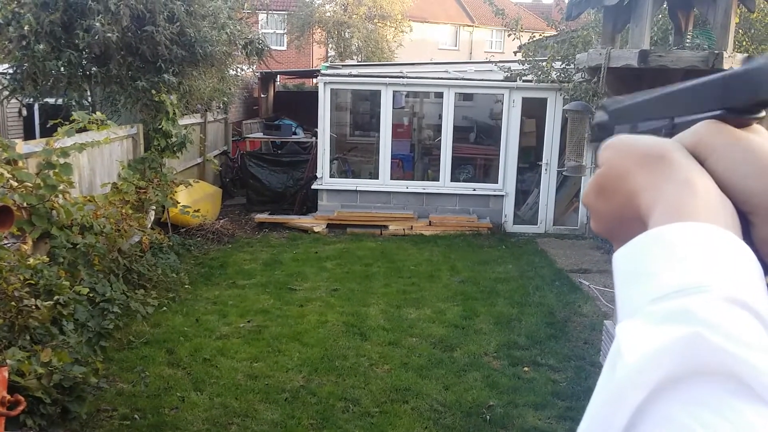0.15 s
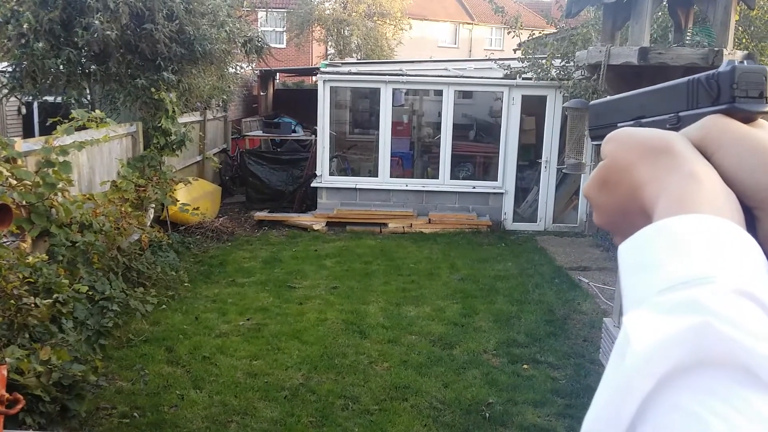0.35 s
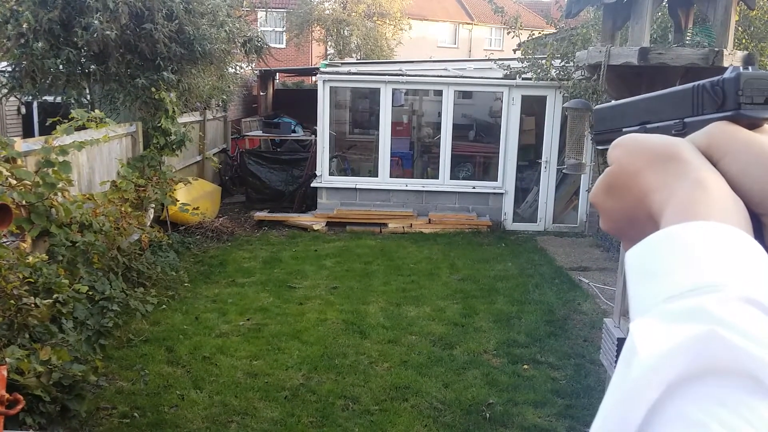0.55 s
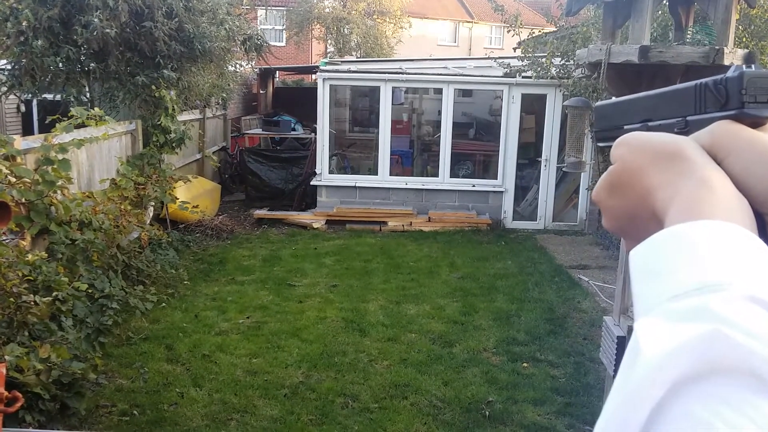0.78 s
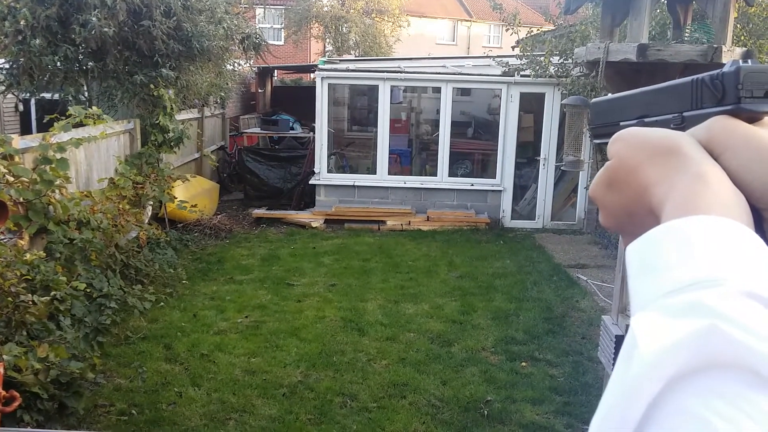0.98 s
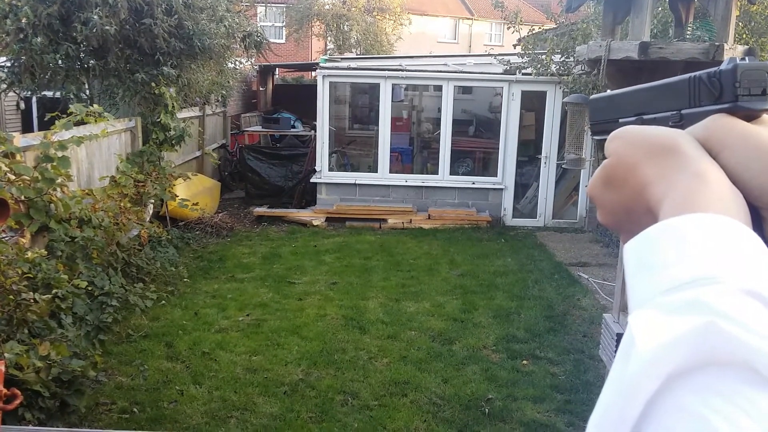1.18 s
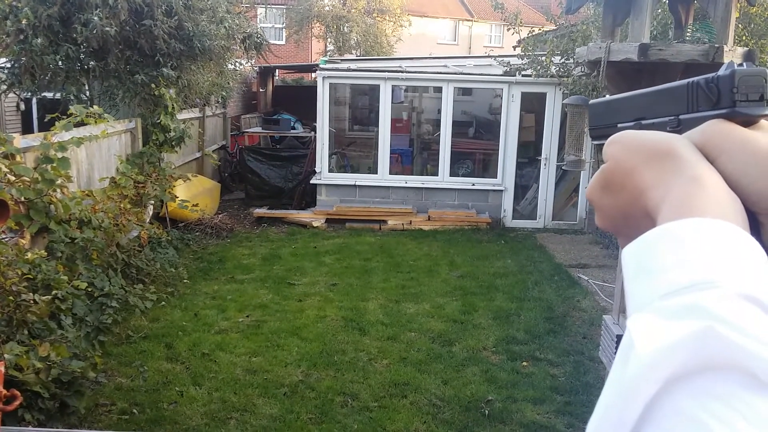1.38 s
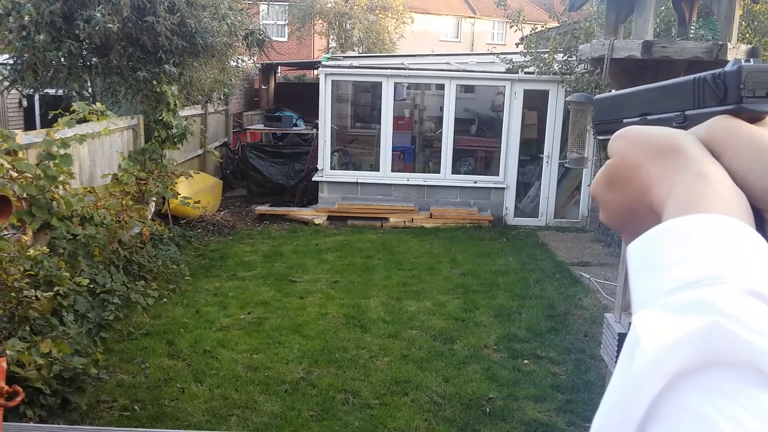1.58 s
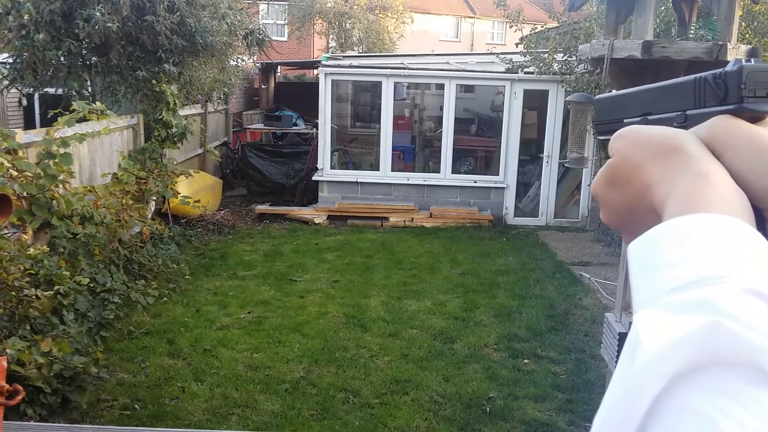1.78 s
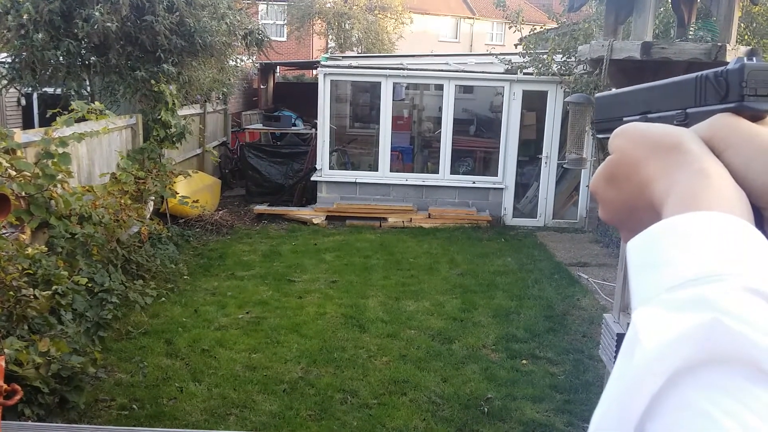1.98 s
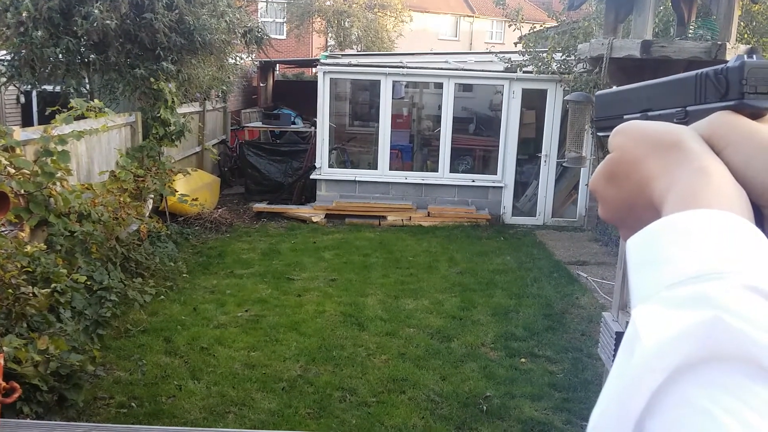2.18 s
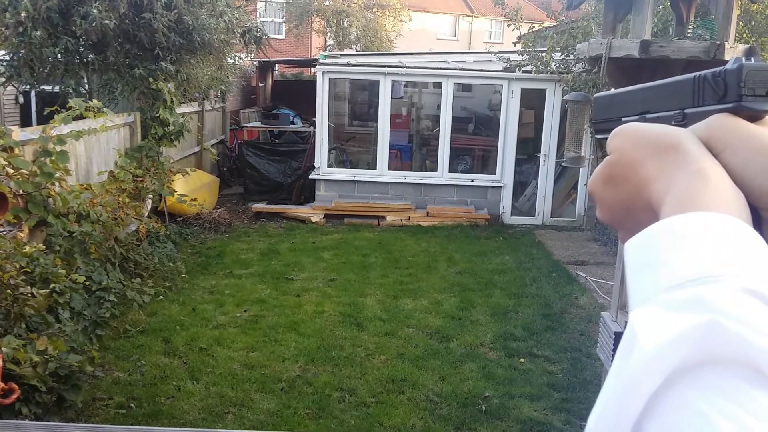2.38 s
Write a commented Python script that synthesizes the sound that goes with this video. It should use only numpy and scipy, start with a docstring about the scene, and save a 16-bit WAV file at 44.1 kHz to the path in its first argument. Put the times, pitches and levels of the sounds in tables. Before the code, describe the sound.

A gas airsoft pistol fires three evenly paced shots right beside the microphone. Each is a sharp pop with a metallic slide clack, followed by the pellet cracking on a target across the garden, with a short echo.

```python
"""Airsoft pistol in a fenced garden

A gas blowback pistol fires three shots right beside the microphone. Each time the trigger ticks, gas
rushes, the hammer knocks, the muzzle pops, and the slide flies back and slams home. A fifth of a
second later the pellet cracks on a target across the lawn. Fences and walls answer over a quiet rumble."""
import sys
import numpy as np
from scipy import signal
from scipy.fft import rfft, irfft, next_fast_len
from scipy.io import wavfile

SR = 44100
rng = np.random.default_rng(int(sys.argv[2]) if len(sys.argv) > 2 else 0)


def pcm_store(signal):
    """Save signal as 16-bit PCM."""
    levels = np.round(np.clip(np.atleast_2d(signal), -1, 1) * 32767)
    wavfile.write(sys.argv[1], SR, levels.astype(np.int16).T)


N = 108045
SIZE = 32768  # samples in one event or echo tail
T, HZ = np.arange(SIZE) / SR, np.fft.rfftfreq(SIZE, 1 / SR)

# shots at the microphone: hammer t/s, hammer level/dB, gas level/dB, muzzle pop t/s, pop level/dB
SHOTS = [(0.2087, 10, 8.5, .2198, 21), (1.1269, 9, 10.5, 1.1388, 20), (1.9556, 10, 9.5, 1.9693, 18.5)]
# spectrum of the hammer on the valve: f/Hz, level/dB
HAMMER_COLOUR = [(30, -31), (80, -10.5), (170, 0.5), (440, 8), (1100, -8.5), (1500, 1.5), (2000, -9.5),
                 (3300, -4), (4900, -2), (5800, -21), (9000, -23), (15000, -27.5)]
# spectrum of the gas rush: f/Hz, level/dB
GAS_COLOUR = [(40, -27.5), (160, 4), (500, 4), (1500, 0), (2100, 0), (4800, -1), (6000, -12.5),
              (15000, -28.5)]
# spectrum of the muzzle pop: f/Hz, level/dB
POP_COLOUR = [(30, -38), (70, -20.5), (140, -4), (380, -0.5), (750, -2), (1200, -10), (1800, -30.5),
              (8000, -52.5)]
# slide contacts, five a shot (rear stop, pellet pick-up, feed, closing, rebound):
# t/s, level/dB, rattle t60/s, ring offset/dB, favoured ring f/Hz, left minus right/dB
SLIDE_CONTACTS = [(0.2311, 2, .035, 0, 4900, 0.5), (0.2495, -0.5, 0.043, -7.5, 3400, -4),
                  (.2530, -1, 0.011, 2.5, 4900, 5), (0.2597, 6.5, 0.048, -6.5, 3460, 1.5),
                  (0.2955, -7.5, 0.014, -15, 4470, -2), (1.1497, 5.5, 0.039, -3.5, 3400, -1.5),
                  (1.1727, 1.5, .08, -4, 4900, 6.5), (1.182, 5.5, 0.027, -2, 3400, 1.5),
                  (1.1858, 2.5, .05, 0, 2685, 1), (1.2070, -7, 0.02, -7.5, 4900, 7.5),
                  (1.9819, 1, 0.039, 7.5, 3670, -2.5), (2.0077, -2.5, .05, -4, 4900, 15),
                  (2.0107, -2.5, 0.011, 1.5, 4900, 3.5), (2.018, 7, 0.055, -11.5, 3400, -1),
                  (2.0419, -7, 0.017, -5.5, 4500, 6.5)]
# spectrum of a slide contact: f/Hz, level/dB
CLACK_COLOUR = [(40, -25.5), (200, -17.5), (450, -6), (1000, -2), (1550, 7.5), (1950, 0), (3200, 2.5),
                (5000, 0), (5800, -7), (9000, -15.5), (11000, -21), (16000, -25.5)]
# modes of slide and frame: f/Hz, level/dB, t60/s
METAL_MODES = [(1570, 1, .03), (2630, -10, 0.06), (3428, 0, 0.022), (4340, -12.5, 0.026),
               (4900, -1.5, 0.024), (7270, -13.5, 0.022), (8860, -9.5, .02)]
# trigger take-up and reset: t/s, level/dB, rattle t60/s
TRIGGER_TICKS = [(.1728, -30.5, 0.019), (.9887, -27, 0.16), (1.0930, -30, .02), (1.9282, -33.5, .025),
                 (2.4078, -25.5, 0.29)]
# spectrum of a trigger tick: f/Hz, level/dB
TRIGGER_COLOUR = [(100, -24), (800, -0.5), (1300, 6), (2000, -1.5), (4700, -4), (6000, -18), (15000, -27)]
# pellet hits, each followed by a weaker knock: t/s, level/dB, treble tilt/(dB per octave), knock f/Hz
PELLET_HITS = [(.4133, 14, -1, 1510), (0.4273, 3.5, -1.5, 812), (1.3372, 13, -3.5, 1650),
               (1.3500, 3, -3, 1150), (2.1739, 13, -5.5, 1000), (2.1915, 3, -4.5, 950)]
# spectrum of the crack from across the lawn: f/Hz, level/dB
TARGET_COLOUR = [(30, -34.5), (80, -18), (170, -1.5), (350, -12.5), (600, -10.5), (1000, -0.5),
                 (1700, -1.5), (2000, -2.5), (2900, -3), (4900, -13), (6000, -28), (10000, -45.5),
                 (16000, -52)]
# where the crack sits in the stereo image: f/Hz, left minus right/dB
TARGET_BALANCE = [(400, -2.5), (2300, -0.5), (4400, 12), (8000, 13), (15000, 5)]
# modes of the target: f/Hz, level/dB, t60/s
TARGET_MODES = [(806, -7.5, 0.034), (985, -1, .03), (1150, -4.5, 0.029), (1465, -1.5, .022),
                (1700, 0.5, 0.03), (2790, -5, 0.036)]
# decay of the echoes from the near fences: f/Hz, t60/s
GARDEN_T60 = [(60, 0.7), (160, 0.23), (400, 0.33), (1400, 0.25), (3000, 0.29), (5000, 0.34), (7500, 0.28),
              (15000, 0.18)]
# scattered sound at the microphone: f/Hz, left-right correlation
STEREO_LIKENESS = [(30, 0.41), (80, 0.13), (160, 0.72), (400, .8), (750, 0.31), (1500, .1), (4000, 0)]
# spectrum of the outdoor rumble: f/Hz, level/dB
RUMBLE_COLOUR = [(25, -26), (50, -9), (95, -2.5), (140, -9.5), (250, -8.5), (500, -16.5), (1000, -22),
                 (1500, -29.5), (2000, -36), (3500, -42), (6000, -47.5), (16000, -49.5)]
# swell of the faint whirr: t/s, level/dB
WHIRR_SWELL = [(1.4, -100), (1.65, -79.5), (1.899, -79.5), (2.3, -104)]

GAS_LEAD_S, GAS_RISE_S, GAS_HOLD_S, GAS_T60_S = .0045, .0013, .023, .065
RECOIL_S, RECOIL_DB, RECOIL_HZ_PER_DB = .0019, -3.5, 71  # frame's thud: after the hammer, a duller pop
METAL_RING_DB, FOCUS_DB_PER_OCTAVE = -6.5, 15.5  # a contact favours the modes near one frequency
TARGET_RING_DB, KNOCK_DB, KNOCK_OCTAVES = -15.5, 2, .15
TILT_FROM_HZ, TILT_TO_HZ = 1110, 5060
CLATTER_DB, CLATTER_T60_S, CLATTER_LOW_HZ = -4.5, .081, 500  # reflections around the target
GUN_WET_DB, TARGET_WET_DB, ECHO_RISE_S = -16, -7.5, .004
FAR_DB, FAR_T60_RATIO, FAR_TOP_HZ = -22.5, 2.8, 3300  # far walls: weaker, slower to die, duller
BOOM_DB, BOOM_HZ, BOOM_T60_S = -26.5, 155, .4  # a low resonance between the walls


def discharge():
    """Close up, a rush of gas begins just before the hammer's knock; the frame thuds, the muzzle pops."""
    out = np.zeros((2, N))
    flow = (1 - np.exp(-T / GAS_RISE_S)) * fade(np.maximum(T - GAS_HOLD_S, 0), GAS_T60_S)
    for s, hammer_db, gas_db, pop_s, pop_db in SHOTS:
        hammer = coloured(blow(t60=.009, scatter_db=2.5), along(HAMMER_COLOUR, HZ))
        gas = coloured(unit(diffuse() * flow), along(GAS_COLOUR, HZ))
        pop = amp(pop_db) * coloured(blow(t60=.05, scatter_db=-13.5), along(POP_COLOUR, HZ))
        thud = -coloured(pop, np.maximum(-HZ / RECOIL_HZ_PER_DB, -60))
        add(out, s - GAS_LEAD_S, amp(gas_db) * gas)
        add(out, s, amp(hammer_db) * hammer)
        add(out, s + RECOIL_S, amp(RECOIL_DB) * thud)
        add(out, pop_s, pop)
    return out


def slide():
    """Close up, the gas-driven slide clacks and rattles at each contact and sets the metal ringing."""
    out = np.zeros((2, N))
    for s, db, t60, ring_db, ring_hz, side_db in SLIDE_CONTACTS:
        clack = coloured(blow(t60, scatter_db=9.5), along(CLACK_COLOUR, HZ))
        modes = [(hz, level - FOCUS_DB_PER_OCTAVE * abs(np.log2(hz / ring_hz)), life)
                 for hz, level, life in METAL_MODES]
        metal = amp(ring_db + METAL_RING_DB) * ring(modes)
        add(out, s, amp(db) * pan(side_db) * (clack + metal))
    return out


def trigger():
    """Close up, the trigger ticks softly on take-up and reset."""
    out = np.zeros((2, N))
    for s, db, t60 in TRIGGER_TICKS:
        add(out, s, amp(db) * coloured(blow(t60, scatter_db=12.5), along(TRIGGER_COLOUR, HZ)))
    return out


def pellets():
    """Across the lawn, each pellet cracks on the target: a hollow knock, a thin clatter, then echoes."""
    out = np.zeros((2, N))
    octaves = np.log2(np.clip(HZ, TILT_FROM_HZ, TILT_TO_HZ) / TILT_FROM_HZ)
    colour = along(TARGET_COLOUR, HZ) + np.array([[.5], [-.5]]) * along(TARGET_BALANCE, HZ)
    low_cut = signal.butter(2, CLATTER_LOW_HZ, "highpass", fs=SR)
    clatter_envelope = fade(T, CLATTER_T60_S) * (1 - np.exp(-T / ECHO_RISE_S))
    for s, db, tilt_db, knock_hz in PELLET_HITS:
        knock_peak = KNOCK_DB / (1 + (np.log2((HZ + 1) / knock_hz) / KNOCK_OCTAVES) ** 2)
        clatter = signal.lfilter(*low_cut, unit(diffuse() * clatter_envelope))
        crack = coloured(blow(t60=.0079, scatter_db=3) + amp(CLATTER_DB) * clatter, colour)
        hit = coloured(crack + amp(TARGET_RING_DB) * ring(TARGET_MODES), knock_peak + tilt_db * octaves)
        add(out, s, garden(amp(db) * hit, TARGET_WET_DB))
    return out


def garden(dry, wet_db):
    """Near fences and far walls send a sound back to the microphone, with a low boom between the walls."""
    hz, t, spectrum = signal.stft(diffuse(), SR, nperseg=256)
    t60 = along(GARDEN_T60, hz)[:, None]
    far = amp(FAR_DB) * fade(t, FAR_T60_RATIO * t60) / (1 + (hz[:, None] / FAR_TOP_HZ) ** 4)
    echoes = signal.istft(spectrum * (fade(t, t60) + far), SR, nperseg=256)[1][:, :SIZE]
    boom = unit(np.sin(2 * np.pi * BOOM_HZ * T) * fade(T, BOOM_T60_S))
    tail = unit(echoes * (1 - np.exp(-T / ECHO_RISE_S))) + amp(BOOM_DB) * boom
    return dry + amp(wet_db) * signal.fftconvolve(dry, tail, axes=1)[:, :dry.shape[1]]


def ambience(rumble_db=-67, whirr_hz=1558, half_width_hz=79):
    """All around, a quiet outdoor rumble; a faint narrow whirr swells once and fades."""
    hz = np.fft.rfftfreq(N, 1 / SR)
    whirr = steady_noise(1 / (1 + ((hz - whirr_hz) / half_width_hz) ** 2))
    swell = amp(np.interp(np.arange(N) / SR, *np.transpose(WHIRR_SWELL)))
    rumble = steady_noise(amp(along(RUMBLE_COLOUR, hz)))
    return amp(rumble_db) * rumble + swell * whirr


def blow(t60, scatter_db):
    """A sharp impulse followed by dense rattle and near reflections."""
    return unit((T == 0) + amp(scatter_db) * unit(diffuse() * fade(T, t60)))


def ring(modes, spread_db=4.5, detune=.022, rise_s=.0007, apart_hz=10000):
    """Decaying modes, new at each strike; left and right differ more in phase toward apart_hz."""
    hz, db, t60 = np.transpose(modes)[:, :, None, None]
    t, shape = T[:SIZE // 8], (len(modes), 2, 1)
    pitch = hz * (1 + detune * rng.standard_normal((len(modes), 1, 1)))
    offset = rng.random(shape) * np.minimum(hz / apart_hz, 1)
    gain = amp(db + spread_db * rng.standard_normal(shape))
    partials = gain * np.sin(2 * np.pi * (pitch * t + offset)) * fade(t, t60)
    sound = unit(partials.sum(0) * (1 - np.exp(-t / rise_s)))
    return np.pad(sound, ((0, 0), (0, SIZE - len(t))))


def diffuse(size=SIZE):
    """White stereo noise, partly alike in the bass and unrelated in the treble."""
    likeness = along(STEREO_LIKENESS, np.fft.rfftfreq(size, 1 / SR))
    turn = np.arccos(np.clip(likeness, -1, 1)) / 2
    mid, side = irfft(rfft(rng.standard_normal((2, size))) * [np.cos(turn), np.sin(turn)], size)
    return np.array([mid + side, mid - side])


def steady_noise(gain):
    """Diffuse noise at RMS 1, shaped by a gain per frequency."""
    return np.sqrt(N) * unit(irfft(rfft(diffuse(N)) * gain, N))


def coloured(x, db):
    """Minimum-phase filter with the given level per frequency."""
    cepstrum = irfft(np.log(amp(db)))
    cepstrum[..., 1:SIZE // 2] *= 2
    cepstrum[..., SIZE // 2 + 1:] = 0
    return irfft(rfft(x) * np.exp(rfft(cepstrum)))


def amp(db):
    """Decibels to gain."""
    return 10 ** (np.asarray(db) / 20)


def along(points, hz):
    """Reads (f/Hz, value) points on a log frequency axis."""
    f, v = np.transpose(points)
    return np.interp(np.log(hz + 1), np.log(f + 1), v)


def unit(x):
    """Scales to a mean energy of 1 per channel."""
    return x / np.sqrt(np.mean(np.sum(x ** 2, axis=-1)) + 1e-20)


def fade(t, t60):
    """Decay by 60 dB in t60 seconds."""
    return amp(-60 * t / np.maximum(t60, 1e-3))


def pan(db):
    """Left and right gains for a level difference."""
    return amp(np.array([[.5], [-.5]]) * db)


def add(track, s, sound):
    """Mixes a sound in at s seconds."""
    part = track[:, round(s * SR):][:, :sound.shape[-1]]
    part += sound[..., :part.shape[1]]


def scene():
    """The pistol close and nearly dry, the target farther off with more echo, the ambience behind."""
    return garden(discharge() + slide() + trigger(), GUN_WET_DB) + pellets() + ambience()


def record(dry, top_hz=15800, edge_hz=500):
    """The microphone chain cuts off steeply above top_hz."""
    size = next_fast_len(N + SIZE)
    gain = np.clip((top_hz - np.fft.rfftfreq(size, 1 / SR)) / edge_hz + 1, 0, 1) ** 2
    return irfft(rfft(dry, size) * gain, size)[:, :N]


dry = scene()
out = record(dry)
pcm_store(out)
```